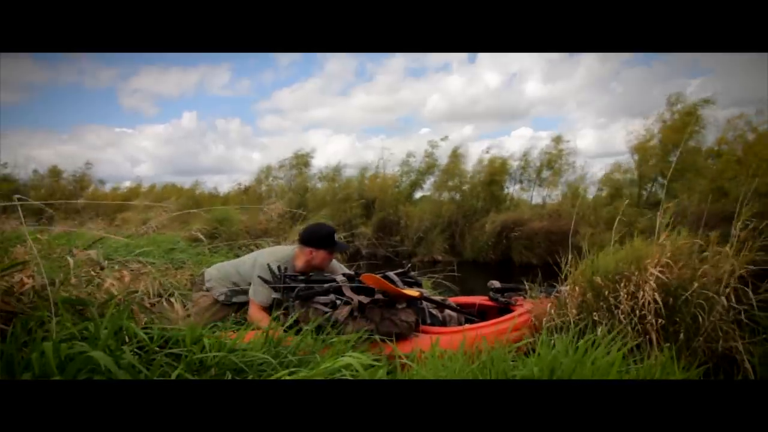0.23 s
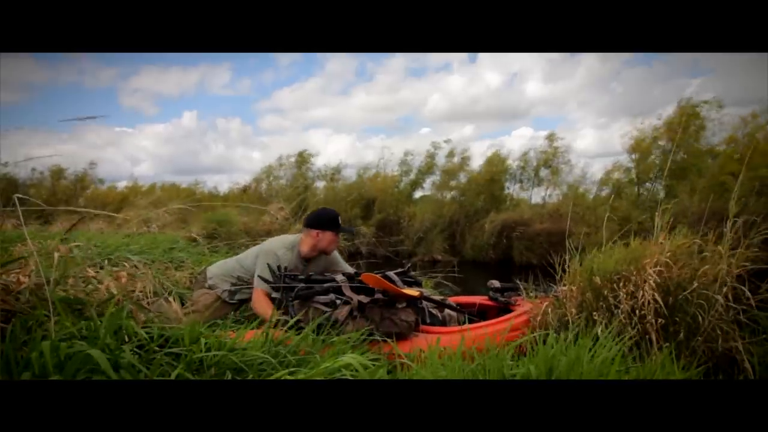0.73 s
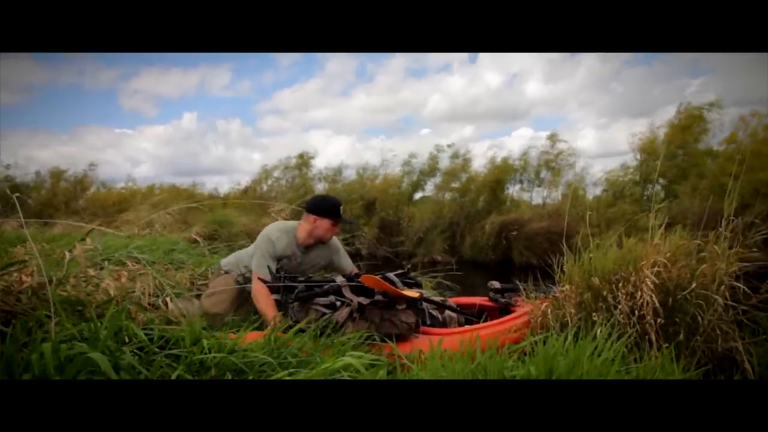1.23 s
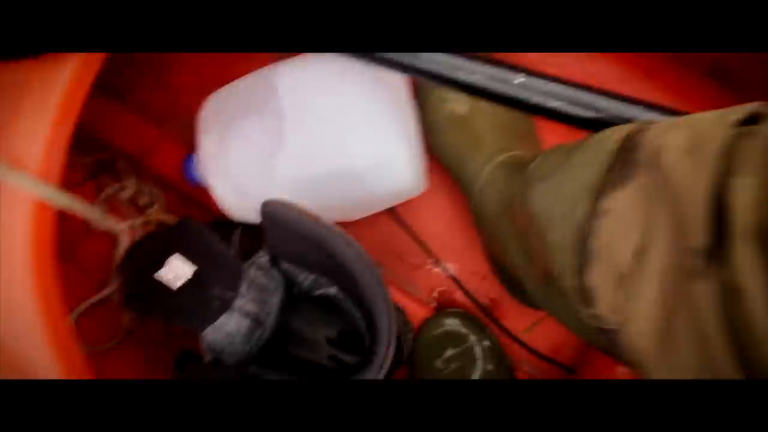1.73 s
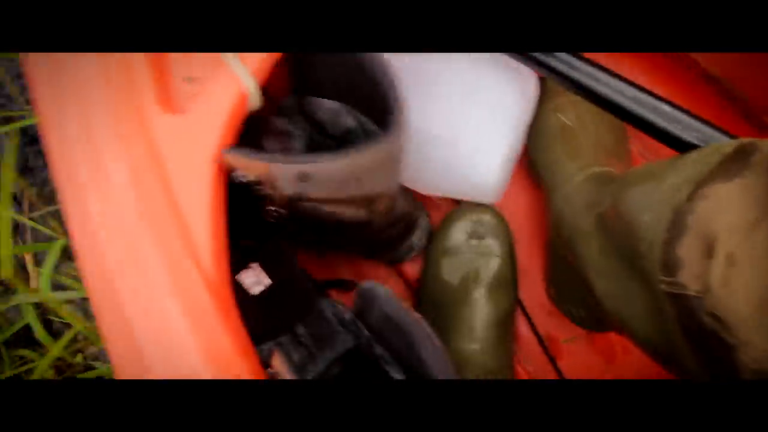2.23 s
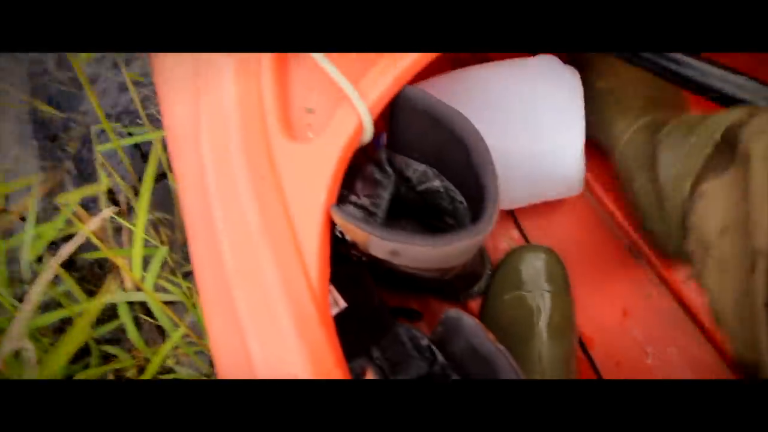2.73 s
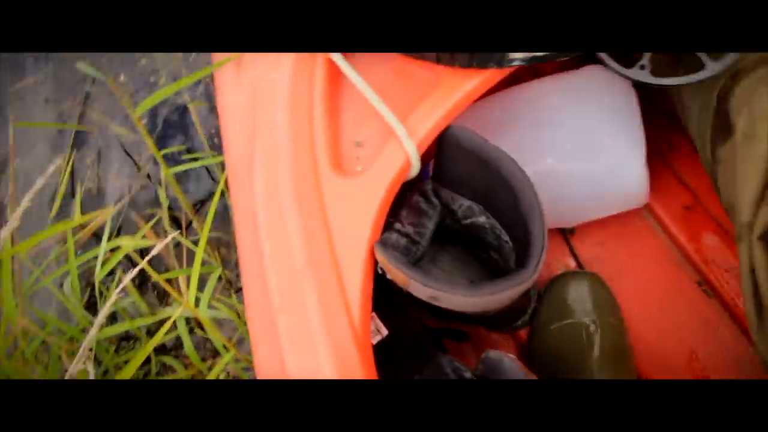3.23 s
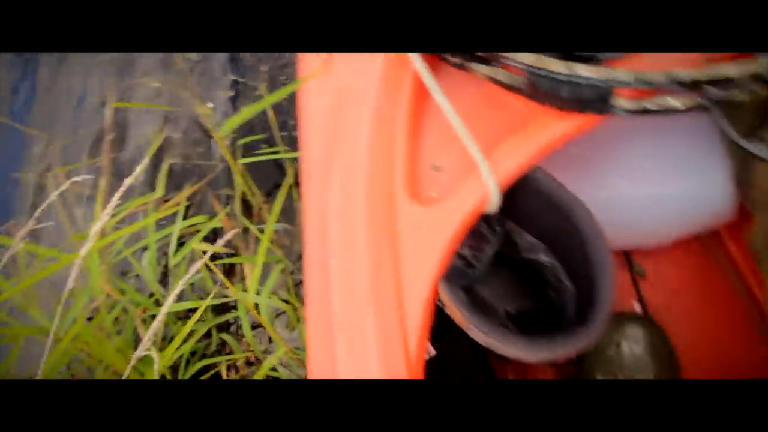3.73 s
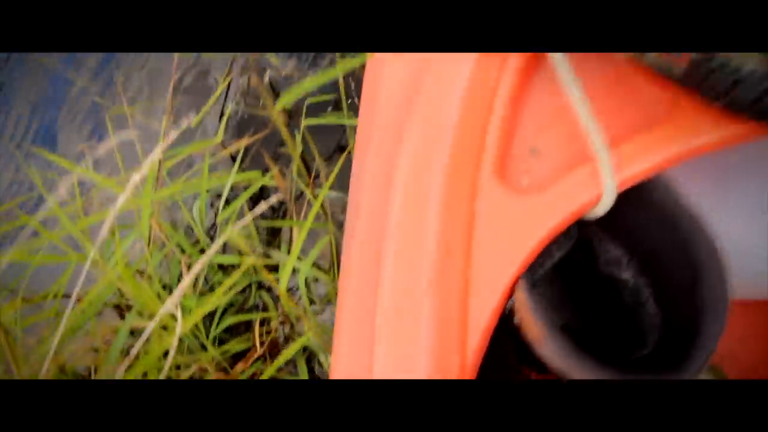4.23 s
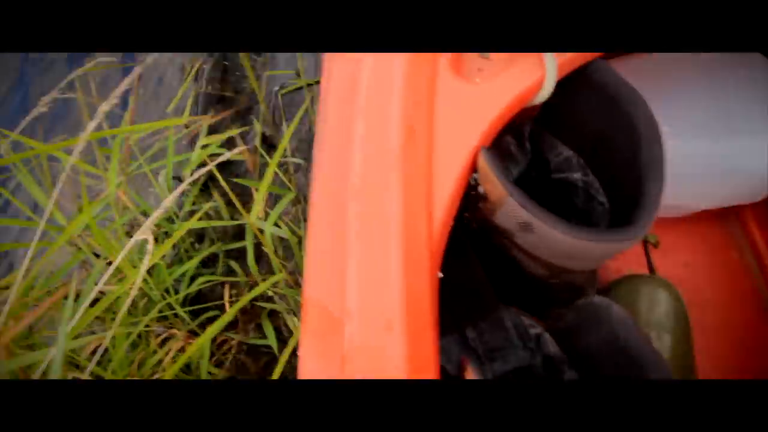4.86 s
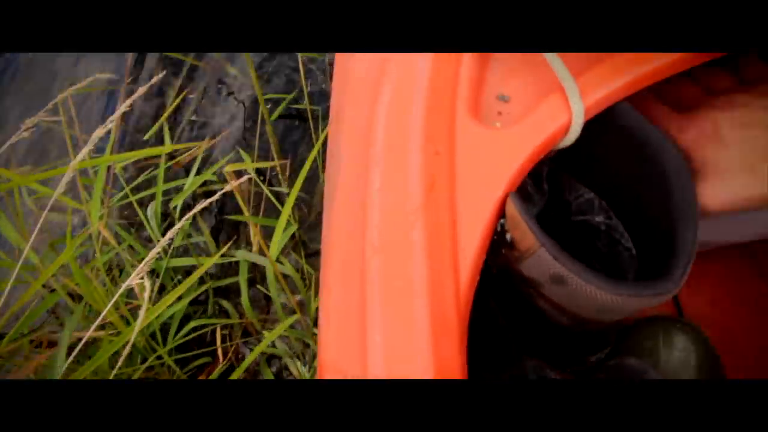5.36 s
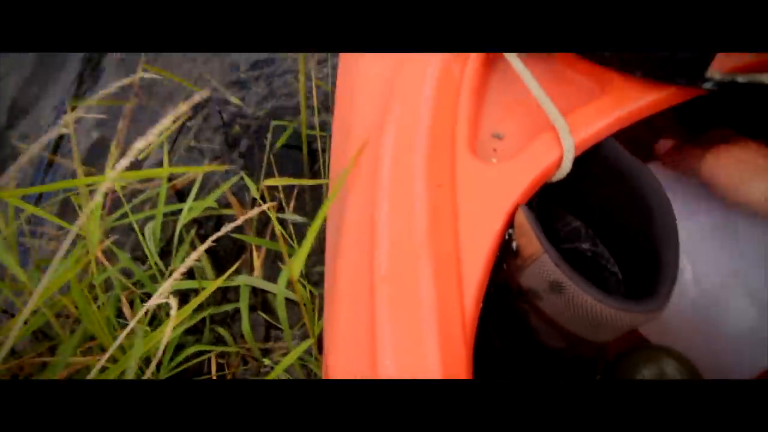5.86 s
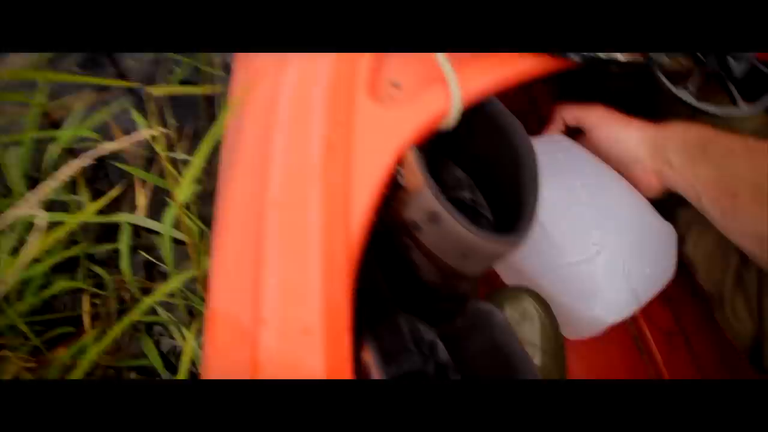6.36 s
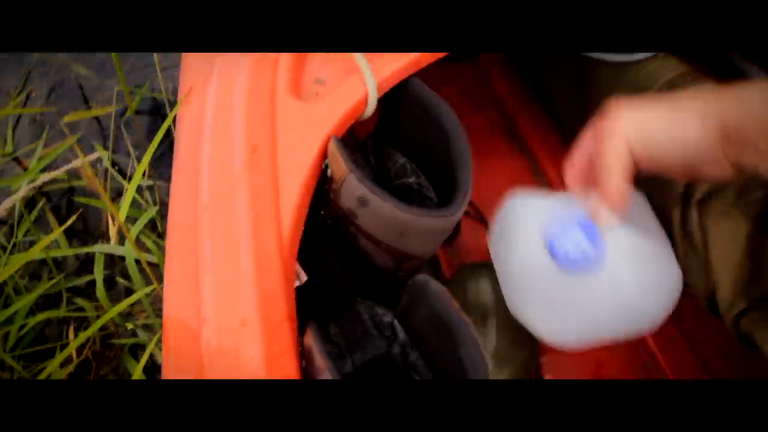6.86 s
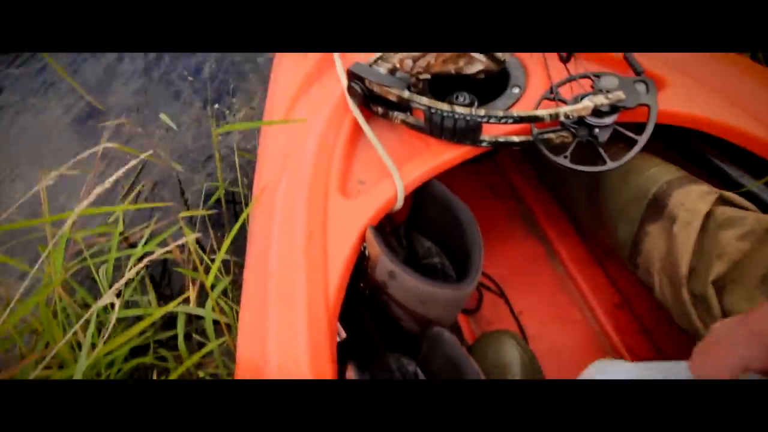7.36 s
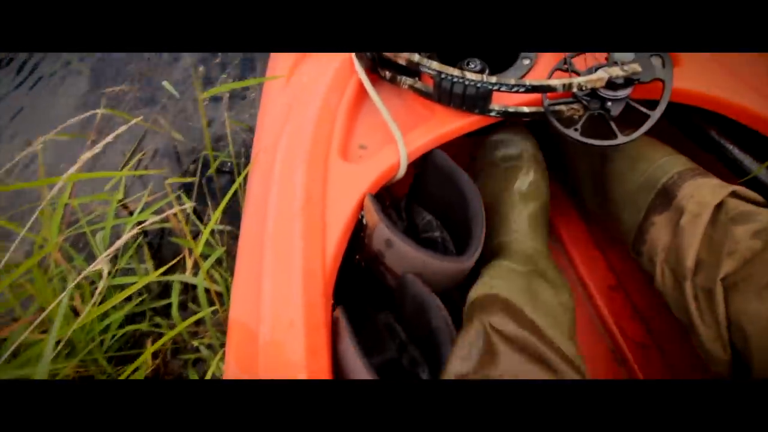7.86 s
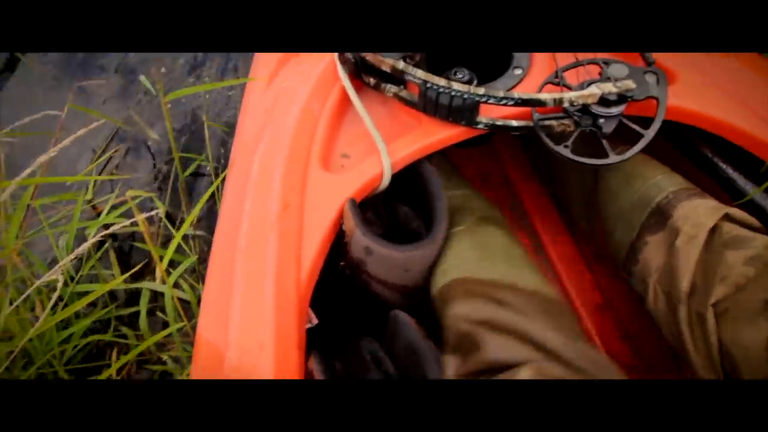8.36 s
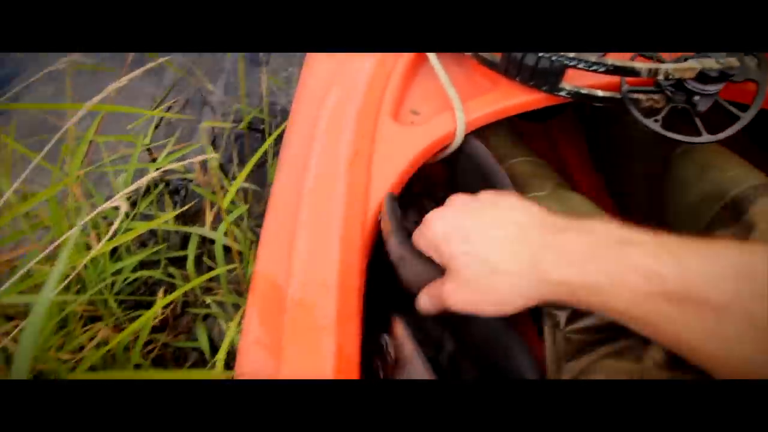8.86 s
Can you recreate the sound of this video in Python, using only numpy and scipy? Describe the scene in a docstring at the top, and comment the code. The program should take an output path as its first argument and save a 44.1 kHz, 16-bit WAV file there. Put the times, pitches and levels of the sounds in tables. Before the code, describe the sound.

Outdoors, close to a plastic kayak, low wind buffets the microphone as the hull sticks and slips across grass with small creaks and a brief rising squeal. Hollow, low thumps follow as boots and gear shift inside. Past the middle, a plastic jug adds higher knocks and a short crackling drag. Waterproof clothing swishes throughout, and more thunks and a sharp clack come at the end, over a faint hiss of reeds.

```python
"""Kayak launch from a grassy creek bank

One microphone close to a loaded plastic kayak, with wind rumbling on it and reeds hissing far off.
Shoved over the grass, the hull sticks and slips, so that it creaks and squeals. Then boots and gear
thunk in the hollow shell, a plastic jug is knocked and dragged about, and grass and clothing rustle."""
import sys
import numpy as np
from scipy import signal
from scipy.fft import rfft, irfft
from scipy.io import wavfile
from scipy.ndimage import uniform_filter1d

SR = 44100
rng = np.random.default_rng(int(sys.argv[2]) if len(sys.argv) > 2 else 0)


def digitize_waveform(pressure):
    """Quantize a signal to 16-bit integers and store it at the path in sys.argv[1].

    Rows of a 2-D input are taken as channels; values are limited to [-1, 1].
    """
    field = np.atleast_2d(pressure).T
    bounded = np.clip(field, -1, 1)
    quanta = np.round(bounded * 32767).astype(np.int16)
    wavfile.write(sys.argv[1], SR, quanta)


N = 400869
TIME = np.arange(N) / SR
RING_TIME = np.arange(int(0.45 * SR)) / SR   # seconds into a ringing tail

# The jug's main modes. Each row: pitch in Hz, relative level in dB, seconds to fall 60 dB.
JUG_MODES = [(193, -1.5, 0.28), (469.5, 5.5, 0.16), (570, 10, 0.057), (622, 13.5, 0.07), (718, 10.5, 0.1),
             (878, 13, 0.058), (1013, 10, 0.055), (1330, 14, 0.024), (1400, 6, 0.062), (1848, 12.5, 0.039),
             (2070, -3, 0.069), (2480, 0, 0.039), (3166, 0, 0.051), (3820, -1, 0.049)]


def hull_squeals():
    """The sliding hull gives a short squeak and, later, a rasping squeal that climbs in pitch."""
    # The two slides. Each row: time in seconds, slips per second, relative level in dB.
    squeak = [(.431, 2250, -32), (.439, 2000, -28), (.442, 1900, -20), (.449, 1850, -21), (.456, 1600, -20),
              (.462, 1920, -18), (.467, 2230, -12), (.4695, 2280, -16)]
    squeal = [(2.021, 200, -21), (2.026, 270, -15), (2.034, 400, -11), (2.046, 760, -10), (2.054, 850, -10),
              (2.059, 1130, -7.5), (2.068, 1280, -9), (2.071, 1370, -2), (2.081, 1530, -2),
              (2.083, 1650, -11), (2.088, 1830, -5), (2.102, 1900, -5.5), (2.107, 2250, -8)]
    # The patch of wall that each shakes. Each row: centre in Hz, width in Hz, gain in dB.
    squeak_wall = [(2150, 450, 3), (3300, 700, -4), (3950, 600, -2), (8200, 3500, -23)]
    squeal_wall = [(740, 920, -4), (1810, 350, 4.5), (2400, 540, 7), (2894, 540, 5.5), (3650, 380, 0.5),
                   (6040, 8800, -22.5)]
    return (stick_slip(squeak, squeak_wall, gain_db=-1, rough=0.7)
            + stick_slip(squeal, squeal_wall, gain_db=-2, rough=0.95, limp=0.35))


def hull_creaks():
    """Lone slips, each with a weaker one at its heels, ring slightly different patches of wall."""
    # The slips. Each row: start in seconds, relative peak in dB, upper edge in Hz.
    slips = [(0.6178, -4.5, 3900), (0.6229, -5.5, 3950), (0.7415, -11.5, 3270), (1.1208, -16, 3000),
             (1.1500, -13.5, 3160), (1.2235, -10.5, 3050), (1.2790, -9.5, 3000), (1.3923, -11, 3100),
             (1.4248, -9.5, 3100), (1.524, -9, 3320), (1.825, -17.5, 3270), (1.8927, -15, 3540),
             (1.9818, -10.5, 6040), (1.9908, -9, 5000), (2.0161, -7, 6000)]
    # A typical patch of wall. Each row: centre in Hz, width in Hz, gain in dB.
    wall = [(1970, 640, 0), (2400, 640, 3), (2850, 600, 0), (3550, 560, -2.5), (5600, 1500, -6)]
    out, jerk = np.zeros(N), signal.unit_impulse(SR // 20)
    for start, db, edge_hz in slips:
        patch = [(hz * rng.normal(1, 0.02), width, gain + rng.normal()) for hz, width, gain in wall]
        tock = butterworth(resonate(jerk, patch), 1490, "high", order=3)
        tock = butterworth(tock, edge_hz, "low", order=4)
        tock = from_db(db - 3.5) * tock / np.abs(tock).max()
        add(out, tock, start)
        add(out, from_db(-5) * tock, start + 0.00218 * rng.uniform(0.49, 1.316))
    return cockpit(out)


def hull_thunks():
    """Boots and gear strike the hollow hull, which rings low."""
    # The blows. Each row: start in seconds, relative bass, middle and treble in dB,
    # click over ringing in dB, pitch that the struck spot favours in Hz.
    hits = [(2.1135, -29, -24, -23.5, -9, 270), (2.149, -25.5, -43, -53, 7, 150),
            (2.5745, -11.5, -21, -35, -0.5, 159), (2.956, -20, -27, -30, -6, 99),
            (2.966, -25, -26, -31, -35, 200), (3.018, -37, -41, -37, -9, 100),
            (3.3085, -17.5, -24, -34.5, -1.5, 356), (3.5195, -27.5, -31.5, -39, -3, 297),
            (3.646, -31, -43.5, -52, -16, 119), (3.903, -40.5, -50, -47, -9, 100),
            (4.161, -22.5, -31.5, -59, 0.5, 109), (4.343, -31, -37.5, -64, -2, 604),
            (4.64, -26, -37.5, -47, -23, 335), (4.851, -37, -44.5, -49.5, -7, 254),
            (4.9385, -18.5, -22.5, -35, -7, 316), (5.014, -26, -31.5, -36, -9, 99),
            (6.29, -32.5, -39, -44, -3, 192), (7.288, -15.5, -28.5, -42, -30, 253),
            (7.377, -36, -35, -43, -7, 150), (7.553, -34, -42, -48, -17, 200),
            (7.606, -32, -38.5, -43.5, -5, 400), (7.855, -25, -34, -53, -4, 298),
            (7.8835, -21, -27.5, -33.5, 7, 410), (7.896, -19.5, -47, -64, -26, 170),
            (7.9365, -28, -33, -50, 1, 110), (8.039, -40, -34.5, -51, 3, 600),
            (8.8905, -33, -27, -43, -5, 1220), (8.942, -25.5, -34, -48, -12, 100),
            (8.998, -28.5, -29.5, -57, 3, 266)]
    # The hull's main modes. Each row: pitch in Hz, relative level in dB, seconds to fall 60 dB.
    modes = [(89.6, 10, 0.33), (158, -2.5, 0.33), (183.7, 4, 0.25), (200, 5, 0.14), (235, -7, 0.18),
             (297, -2, 0.23), (327, -3, 0.039), (440, -6, 0.14), (604, -13, 0.13), (703, -26, 0.14),
             (873, -13.5, 0.17), (1400, -22, 0.18), (2040, -21, 0.12), (3260, -28.5, 0.32),
             (3560, -15, 0.068)]
    # Its crowd of fine modes. Each row: frequency in Hz, relative spectral density in dB.
    fine = [(50, 0), (90, 9), (200, 12.5), (400, -7), (1000, -13), (2000, -23), (3600, -24.5), (5000, -41),
            (9000, -40.5), (16000, -85)]
    return blows(hits, modes, fine, fine_db=-6, bass_click_db=-9.5, damping=1.02, swell_s=0.0015,
                 trims_db=(0, 1.36, 2.5), emphasis_db=struck_spots(hits, modes))


def jug_knocks():
    """Knocks on the plastic jug ring its thin wall, higher than the hull."""
    # The knocks. Each row: start in seconds, relative bass, middle and treble in dB,
    # click over ringing in dB, pitch that the struck spot favours in Hz.
    hits = [(5.487, -32.5, -23, -30, -9, 610), (5.8857, -38, -22, -21, 0, 1130),
            (6.2408, -31.5, -11.5, -21.5, 0.5, 513), (6.469, -47, -46, -44, -2, 2010),
            (6.733, -45, -35.5, -50, -8, 1400), (6.778, -40.5, -35, -59, -31, 514),
            (6.885, -37.5, -48, -44, -2, 600), (6.93, -42, -50, -60, -8, 600),
            (7.092, -32.5, -29, -62, -25, 850), (7.2864, -38, -23, -39, -1, 1180)]
    # The jug's crowd of fine modes. Each row: frequency in Hz, relative spectral density in dB.
    fine = [(60, -39), (200, 14.5), (400, -6.5), (600, 9), (1800, 3.5), (2600, -3), (4000, -5.5),
            (5500, -19), (9000, -29), (16000, -64)]
    return blows(hits, JUG_MODES, fine, fine_db=-9, bass_click_db=-37, damping=0.78, swell_s=0.0012,
                 trims_db=(2, -2, -1), emphasis_db=struck_spots(hits, JUG_MODES))


def rim_clacks():
    """Hard gear hits the cockpit rim with a quick, bright clack."""
    # Each row: start in seconds, relative bass, middle and treble in dB, click over ringing in dB.
    hits = [(0.7495, -38, -44.5, -31.5, 0.5), (2.819, -73, -50, -41.5, -21),
            (3.219, -29.5, -42.5, -42.5, -21.5), (4.728, -37.5, -39, -18, -2), (6.108, -58, -51.5, -39, -3),
            (6.631, -61, -46.5, -37, 1), (7.243, -45, -48, -43, -3), (7.481, -60, -62, -44, 8),
            (7.563, -58, -54, -40, 2), (8.318, -44, -47, -40, -3), (8.805, -54, -52, -44.5, -19),
            (8.9768, -36, -35.5, -20.5, 0.5), (9.035, -52, -43, -33.5, -2)]
    # The rim's main modes. Each row: pitch in Hz, relative level in dB, seconds to fall 60 dB.
    modes = [(1450, 6.5, 0.04), (2230, 3, 0.059), (2840, 2, 0.12), (3350, 1, 0.15), (3690, 17, 0.0093),
             (3680, -5, 0.19), (5350, -13, .097)]
    # Its crowd of fine modes. Each row: frequency in Hz, relative spectral density in dB.
    fine = [(100, 18), (600, 12.5), (1400, 4), (2600, 6.5), (3900, 4), (5000, -3), (8000, -6.5),
            (16000, -35)]
    return blows(hits, modes, fine, fine_db=4, bass_click_db=-13, damping=0.78, swell_s=0.00024,
                 trims_db=(0, 7, -2.5))


def boot_squeak():
    """A rubber sole sticks and slips on the plastic in one rising chirp."""
    # The slide. Each row: time in seconds, slips per second, relative level in dB.
    slide = [(2.565, 460, -20), (2.569, 650, -17), (2.572, 950, -11), (2.580, 1130, -16),
             (2.586, 1080, -26)]
    # The sole's resonances. Each row: centre in Hz, width in Hz, gain in dB.
    sole = [(600, 130, -3.5), (1010, 440, -10.5), (2150, 820, -22)]
    return stick_slip(slide, sole, gain_db=-3.5, rough=0.99)


def shoves_and_rustle():
    """Each shove or rub scrapes and sets the hull booming; cloth adds only swish and hiss."""
    # The hull dragged over grass, then boots, sleeves and jug rubbing along the cockpit.
    # Each row: start and length in seconds, then relative friction, brightness and boom in dB.
    shoves = [(0.358, 0.088, -45, 1.5, -24), (0.512, 0.13, -35, 1.5, -28.5), (0.66, 0.071, -63, -12, -27),
              (1.01, 0.12, -36.5, 2, -50), (1.24, 0.16, -38, 0.5, -27.5), (1.402, 0.3, -30, 1.5, -26),
              (1.496, 0.12, -26.5, 7, -24), (1.732, 0.2, -38, 2, -31), (2.124, 0.15, -31, 1, -23.5),
              (2.317, 0.069, -40.5, 1, -33.5), (3.83, 0.15, -54, 0, -30), (3.992, 0.37, -45.5, 4.5, -28),
              (4.112, 0.11, -44, 5.5, -27)]
    rubs = [(0.046, 0.041, -42, 6, -52), (2.485, 0.12, -39, 3.5, -49), (2.591, 0.11, -36.5, 0.5, -38),
            (2.71, 0.34, -45.5, 3, -38), (2.979, 0.027, -36, -1, -15), (3.414, 0.2, -46, 3, -33.5),
            (3.613, 0.11, -46.5, -0.5, -34.5), (5.52, 0.12, -31.5, 2, -31.5),
            (5.647, 0.12, -33.5, 0.5, -34), (5.958, 0.14, -43.5, 5, -65), (6.442, 0.089, -42.5, 3.5, -31),
            (6.534, 0.13, -40.5, 1, -57), (6.827, 0.12, -40.5, 1, -28.5), (6.997, 0.066, -51, -2, -33.5),
            (7.38, 0.32, -48.5, 3.5, -33.5), (7.962, 0.11, -38, 1.5, -26), (8.08, 0.17, -44.5, 0.5, -31.5),
            (8.319, 0.17, -40.5, 0, -27.5), (8.507, 0.17, -49, 4.5, -62), (8.858, 0.14, -36.5, 0.5, -27.5)]
    # Waterproof cloth swishing. Each row: start and length in seconds, relative level in dB.
    swishes = [(0.0, 0.086, -55), (0.4, 0.13, -48), (1.1, 0.38, -53.5), (1.436, 0.068, -41.5),
               (2.148, 0.07, -43), (3.128, 0.42, -59), (5.56, 0.37, -53.5), (6.477, 0.87, -54.5),
               (7.68, 0.24, -50), (8.062, 0.087, -49), (8.247, 0.12, -50), (9.007, 0.077, -49)]
    moves = shoves + rubs
    _, _, friction_db, bright_db, boom_db = np.transpose(moves)
    cloth = effort(swishes, [db for _, _, db in swishes], rest_db=-63)
    # Grass and hull never come quite to rest.
    scrape_gain = effort(moves, friction_db - bright_db - 1.5, rest_db=-56.5)
    swish_gain = effort(moves, friction_db + bright_db - 6, rest_db=-59.5)
    hiss_gain = effort(moves, friction_db + bright_db - 21, rest_db=-np.inf)
    boom_gain = effort(moves, boom_db - 4.5, rest_db=-49)
    scrape, swish, hiss = friction()
    return (scrape * scrape_gain + swish * np.hypot(swish_gain, from_db(6.5) * cloth)
            + hiss * np.hypot(hiss_gain, cloth) + hull_boom() * boom_gain)


def friction(snaps_per_s=300):
    """Blades and fibres catch and let go in clumps of snaps over smooth noise: scrape, swish, hiss."""
    # The colour of rubbing. Each row: frequency in Hz, relative spectral density in dB.
    spectrum = [(180, -44), (300, -15), (354, 2), (455, -25.5), (502, 7), (842, -9.5), (1080, -3.5),
                (1870, -12.5), (2000, -8), (2610, -9), (3080, -11.5), (5800, -17.5), (12700, -26),
                (16000, -36.5)]
    caught = rng.random(N) < snaps_per_s * from_db(5 * drift(14)) / SR
    grains = unit_power(snaps(caught, spread_db=5.5, max_spreads=4))
    rough = rng.standard_normal((2, N)) + from_db(-1.5) * grains
    patchy = sum(band * from_db(2 * drift(35)) for _, band in bands(spectrum, rough))
    registers = [([350, 1400], "band"), ([1400, 5500], "band"), (5500, "high")]
    return [unit_power(butterworth(patchy, edges, kind, order=3)) for edges, kind in registers]


def hull_boom():
    """The rubbed hull rumbles in quick lumps."""
    # The colour of the boom. Each row: frequency in Hz, relative spectral density in dB.
    spectrum = [(45, -14.5), (70, 4), (90, 7.5), (130, -1.5), (190, 1.5), (280, -6), (400, -44), (700, -32)]
    return unit_power(coloured_noise(spectrum) * from_db(4.5 * drift(42)))


def scuffs():
    """Brief rough slides: uneven slips shake one patch of wall and, more weakly, the rest."""
    # Short scuffs on the plastic, and the rasp at the start of the hull's squeal.
    # Each row: start and length in seconds, relative level in dB, centre in Hz.
    slides = [(1.704, 0.01, -41, 1540), (2.029, 0.031, -29, 2400), (2.956, 0.054, -45, 2050),
              (4.587, 0.039, -57, 1650), (6.079, 0.013, -49.5, 4150), (6.396, 0.031, -53, 1450),
              (6.429, 0.012, -52, 3970), (6.741, 0.014, -47.5, 3650), (7.244, 0.04, -43, 600),
              (7.246, 0.055, -47, 2190), (7.839, 0.014, -46, 2950), (8.345, 0.015, -49, 3650),
              (8.428, 0.0092, -48, 2070), (8.881, 0.051, -38, 1620)]
    out = np.zeros(N)
    for start, length, db, hz in slides:
        slips = (rng.standard_normal(8000) * (rng.random(8000) < 0.06))[:int(length * SR)]
        rasp = resonate(slips, [(hz, 0.079 * hz, 0)]) + resonate(slips, [(hz, hz, -11.5)])
        rasp *= signal.windows.tukey(len(rasp), 0.3)
        add(out, from_db(db + 10.5) * unit_power(rasp), start)
    return butterworth(out, 5100, "low")


def jug_drags(snaps_per_s=1100):
    """The dragged jug catches and lets go in tiny snaps that ring its modes: a fine hollow crackle."""
    # Drags over boots and floor. Each row: start and length in seconds, relative level in dB.
    drags = [(5.66, 0.089, -34.5), (6.554, 0.079, -39), (6.728, 0.05, -44.5), (6.862, 0.07, -55)]
    catches = snaps(rng.random(N) < snaps_per_s / SR, spread_db=1, max_spreads=3)
    # The modes as resonances, tilted up by 6 dB an octave.
    wall = [(hz, np.log(1000) / (np.pi * t60), db + 6 * np.log2(hz / 1000)) for hz, db, t60 in JUG_MODES]
    hollow = unit_power(resonate(catches, wall))
    crisp = from_db(-2.5) * unit_power(butterworth(catches, [900, 3800], "band"))
    dragging = sum(from_db(db) * stroke(start, length) for start, length, db in drags)
    return unit_power(hollow + crisp) * dragging


def jingle():
    """Something small and metal in the load shivers, thin and high."""
    # The shivers. Each row: start and length in seconds, pitch in Hz, level in dB.
    shivers = [(3.306, .018, 9150, -50), (3.41, .05, 8120, -61), (3.458, .062, 8200, -56)]
    out = np.zeros(N)
    for start, length, hz, db in shivers:
        metal = [(hz, 200, 0)]
        shiver = resonate(resonate(rng.standard_normal(SR // 2), metal), metal)[-int(length * SR):]
        add(out, from_db(db) * unit_power(shiver) * signal.windows.tukey(len(shiver)), start)
    return out


def wind():
    """Wind rumbles on the microphone; the far reeds rise and fall gently with it."""
    # A gust on the open bank, then the lee of the reeds. Each row: time in seconds, relative dB.
    gust = [(0.0, -29.5), (0.16, -16.5), (0.3, -24.5), (0.44, -20.5), (0.76, -23.5), (0.86, -25),
            (1.05, -15), (1.55, -13.5), (1.8, -36), (3.7, -34), (4.0, -34.5), (4.5, -40.5), (9.08, -46.5)]
    # The colour of the rumble. Each row: frequency in Hz, relative spectral density in dB.
    spectrum = [(15, -7), (30, -18), (55, -5.5), (75, -7.5), (110, -10), (200, -25.5), (400, -59)]
    gust_db, = in_time(gust)
    rumble = from_db(gust_db - 7.5) * coloured_noise(spectrum)
    return rumble + reeds() * from_db(0.25 * (gust_db - gust_db.mean()))


def reeds():
    """Breeze in distant reeds: a smooth hiss with a narrow whisper in it."""
    # The colour of the hiss. Each row: frequency in Hz, relative spectral density in dB.
    spectrum = [(300, 14.5), (1500, -24.5), (3700, -10), (6000, -15), (12500, -10), (16000, -11.5)]
    # The whisper's band. Its row: centre in Hz, width in Hz, gain in dB.
    whisper_band = [(3600, 360, 0)]
    hiss = coloured_noise(spectrum)
    whisper = unit_power(resonate(rng.standard_normal(N), whisper_band))
    return from_db(-56) * hiss + from_db(-62.5) * whisper


def stick_slip(slide, resonances, gain_db, rough, limp=0):
    """Uneven jerks, one a slip, fuse into a squeak; with a limp, strong and weak alternate and rasp."""
    slips_per_s, db = in_time(slide)
    slips = np.cumsum(slips_per_s * (1 + 0.05 * rough * drift(250))) / SR
    whole = np.floor(slips)
    steps = whole + np.minimum(slips % 1 * SR / slips_per_s, 1)   # each slip takes one sample
    jerks = np.diff(steps, prepend=0) * (1 + limp * np.cos(np.pi * whole))
    uneven = jerks * from_db(3 * rough * drift(500)) + 0.05 * rough * rng.standard_normal(N)
    tone = butterworth(resonate(uneven, resonances), 8000, "low")
    levelled = tone / np.sqrt(np.abs(uniform_filter1d(tone ** 2, size=220)) + 1e-12)
    sliding = uniform_filter1d(1.0 * (TIME > slide[0][0]) * (TIME < slide[-1][0]), size=30)
    return cockpit(levelled * from_db(db + gain_db) * sliding)


def blows(hits, modes, fine, fine_db, bass_click_db, damping, swell_s, trims_db, emphasis_db=0):
    """A contact clicks, then main and fine modes ring; each blow has its own bass, middle and treble."""
    # Decay of fine modes. Each row: frequency in Hz, seconds to fall 60 dB at a damping of 1.
    fine_t60 = [(80, 0.13), (250, 0.19), (1000, 0.15), (3500, 0.12), (12000, 0.039)]
    hits, t = np.array(hits), RING_TIME
    hz, db, t60 = np.transpose(modes)[:, :, None]
    strengths = from_db(emphasis_db + rng.normal(0, 0.77, (len(hits), len(modes))))
    partials = from_db(db - 60 * t / t60) * np.sin(2 * np.pi * hz * t)
    main = unit_power(strengths @ partials)
    white = rng.standard_normal((len(hits), 2, len(t))).swapaxes(0, 1)
    crowd = sum(band * from_db(-60 * t * damping / at_hz(fine_t60, f)) for f, band in bands(fine, white))
    ringing = (main + from_db(fine_db) * unit_power(crowd)) * (1 - np.exp(-t / swell_s))
    click = contact_click(fine, len(t))
    registers = [([66, 400], "band", bass_click_db), ([400, 1500], "band", 0), (1500, "high", 0)]
    sounds, out = 0, np.zeros(N)
    for k, (edges, kind, click_trim_db) in enumerate(registers):
        level_db, click_db = hits[:, [1 + k]] + trims_db[k], hits[:, [4]] + click_trim_db
        contact = unit_attack(butterworth(click, edges, kind, order=3))
        body = unit_attack(butterworth(ringing, edges, kind, order=3))
        sounds = sounds + from_db(level_db) * unit_attack(body + from_db(click_db) * contact)
    for start, sound in zip(hits[:, 0], sounds):
        add(out, sound, start)
    return out


def struck_spots(hits, modes, boost_db=6.5, width_octaves=0.46):
    """Where a blow lands favours the modes near one pitch: dB for each blow and mode."""
    octaves = np.log2(np.array(modes)[:, 0] / np.array(hits)[:, -1:])
    return boost_db * np.exp(-(octaves / width_octaves) ** 2)


def contact_click(spectrum, count):
    """The most compact causal click with this spectrum, rolled off below its lowest point."""
    hz = np.maximum(np.arange(count + 1) * SR / (2 * count), 1)
    bass_cut = -np.log(1 + (spectrum[0][0] / hz) ** 4)
    cepstrum = irfft(np.log(from_db(at_hz(spectrum, hz))) + bass_cut)[:count]
    return irfft(np.exp(rfft(2 * cepstrum, 2 * count) - cepstrum[0]))[:count]


def snaps(caught, spread_db, max_spreads):
    """An impulse of either sign at each catch: most are weak, a few strong."""
    signs = rng.choice([-1, 1], N)
    return caught * signs * from_db(spread_db * np.minimum(rng.exponential(1, N), max_spreads))


def stroke(start_s, length_s, rise_s=0.029, fade_s=0.04):
    """Speed of one movement, 0 to 1: it gathers, holds, then dies away."""
    t = TIME - start_s
    return np.clip(t / rise_s, 0, 1) * np.exp(-np.maximum(t - length_s, 0) / fade_s)


def effort(moves, levels_db, rest_db):
    """Gain of a layer fed by several movements; their powers add to its power at rest."""
    speeds = np.array([stroke(start, length) for start, length, *_ in moves])
    return np.sqrt(from_db(rest_db) ** 2 + from_db(levels_db) ** 2 @ speeds ** 2)


def cockpit(x):
    """Reflections from the near walls arrive within milliseconds and fray a gliding tone."""
    t = np.arange(int(0.02 * SR)) / SR
    echoes = rng.standard_normal(len(t)) * (t > 0.002) * np.exp(-t / 0.007)
    return x + from_db(-8) * signal.fftconvolve(x, echoes / np.linalg.norm(echoes))[:N]


def shell(x, t60_s=0.23):
    """The whole shell rings on, duller, after the wall has been shaken."""
    tail = rng.standard_normal(len(RING_TIME)) * from_db(-60 * RING_TIME / t60_s)
    dull_tail = butterworth(tail / np.linalg.norm(tail), 4200, "low")
    return x + from_db(-12) * signal.fftconvolve(x, dull_tail)[:N]


def resonate(x, resonances):
    """Damped resonances in parallel, alternating in sign."""
    out = 0
    for k, (hz, width, db) in enumerate(resonances):
        r = np.exp(-np.pi * width / SR)
        feedback = [1, -2 * r * np.cos(2 * np.pi * hz / SR), r * r]
        out = out + (-1) ** k * from_db(db) * signal.lfilter([1 - r, 0, r - 1], feedback, x + 1e-18)
    return out


def bands(spectrum, two_noises):
    """Half-octave bands (centre Hz, sound) of a spectrum; neighbours take different noises."""
    edges = 18 * 2 ** (np.arange(21) / 2)
    for k, (low, high) in enumerate(zip(edges, edges[1:])):
        if high > spectrum[0][0] and low < spectrum[-1][0]:
            hz = np.sqrt(low * high)
            yield hz, from_db(at_hz(spectrum, hz)) * butterworth(two_noises[k % 2], [low, high], "band")


def coloured_noise(spectrum):
    """Steady noise with this spectrum, at unit power."""
    return unit_power(sum(band for _, band in bands(spectrum, rng.standard_normal((2, N)))))


def drift(rate_hz):
    """A smooth random wander with a spread of 1."""
    r = np.exp(-80 * np.pi * rate_hz / SR)   # one step every 40 samples
    slow = signal.lfilter([1], [1, -2 * r, r * r], rng.standard_normal(N // 40 + 2002))[2000:]
    return np.interp(np.arange(N) / 40, np.arange(len(slow)), unit_power(slow))


def butterworth(x, edges_hz, kind, order=2):
    """Low-, high- or band-pass filter."""
    return signal.sosfilt(signal.butter(order, edges_hz, kind, fs=SR, output="sos"), x + 1e-18)


def in_time(rows):
    """The columns of a timed curve at every sample."""
    seconds, *columns = np.transpose(rows)
    return [np.interp(TIME, seconds, column) for column in columns]


def at_hz(points, hz):
    """A curve read on a log-frequency axis."""
    frequencies, values = np.transpose(points)
    return np.interp(np.log(hz), np.log(frequencies), values)


def from_db(db):
    """Decibels to gain."""
    return 10 ** (np.asarray(db) / 20)


def unit_power(x):
    """Each row scaled to unit power."""
    return x / np.sqrt(np.mean(x ** 2, axis=-1, keepdims=True) + 1e-20)


def unit_attack(x):
    """Each row scaled to unit power over its first 20 ms."""
    return x / x[..., :int(0.02 * SR)].std(axis=-1, keepdims=True)


def add(out, sound, start_s):
    """Mixes a sound in at a time."""
    start = max(round(start_s * SR), 0)
    out[start:start + len(sound)] += sound[:N - start]


def scene():
    """Hull, load, grass and wind at one microphone on the bank."""
    slipping = hull_squeals() + hull_creaks() + boot_squeak() + scuffs()
    load = hull_thunks() + jug_knocks() + rim_clacks() + jug_drags() + jingle()
    return (shell(slipping) + load + shoves_and_rustle() + wind())[None]


def record(dry):
    """Peaks over full scale clip, and the treble is cut steeply above 16.2 kHz."""
    clipped = np.clip(dry, -1, 1)
    return signal.sosfilt(signal.ellip(10, 0.2, 70, 16200, fs=SR, output="sos"), clipped)


dry = scene()
out = record(dry)
digitize_waveform(out)
```